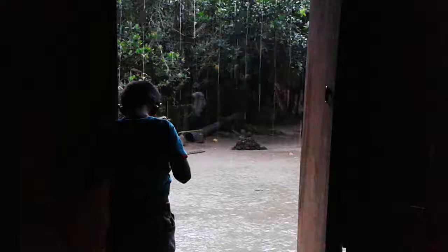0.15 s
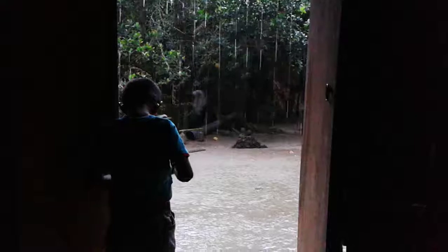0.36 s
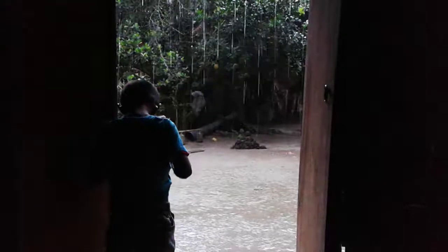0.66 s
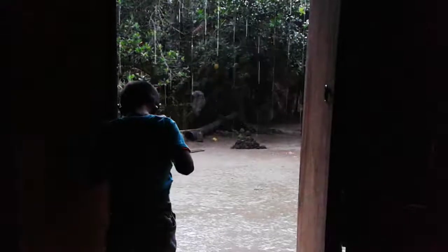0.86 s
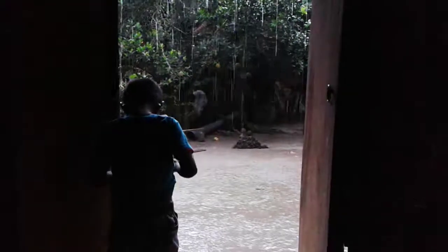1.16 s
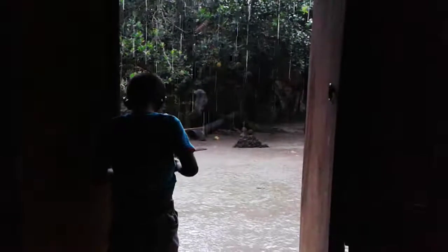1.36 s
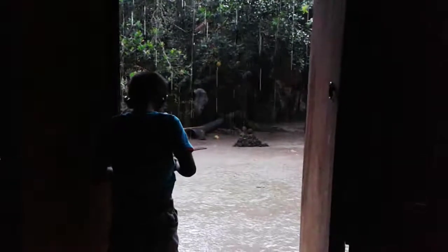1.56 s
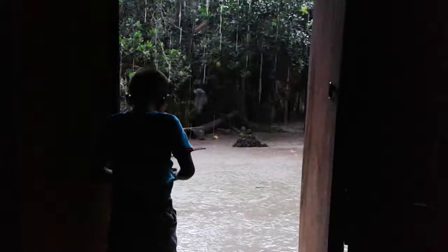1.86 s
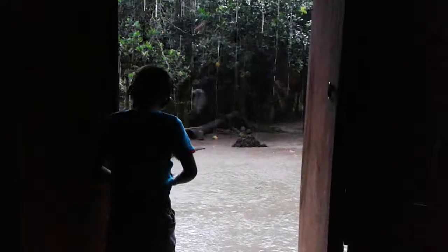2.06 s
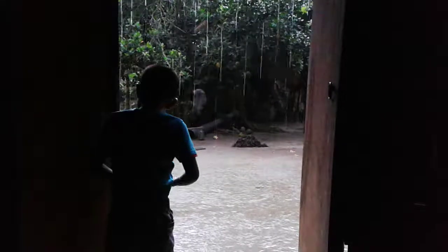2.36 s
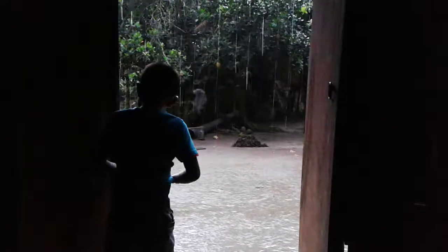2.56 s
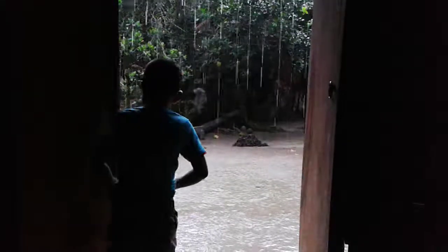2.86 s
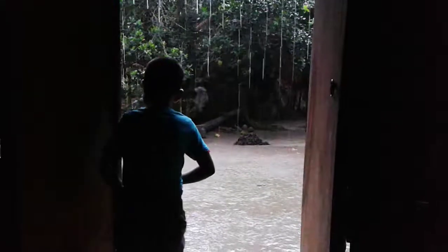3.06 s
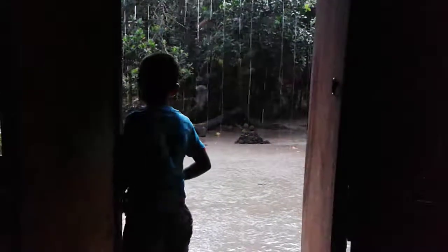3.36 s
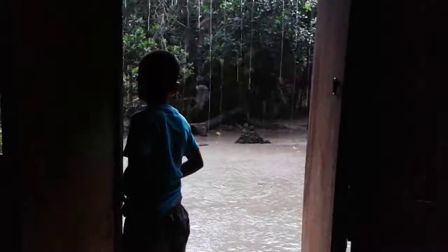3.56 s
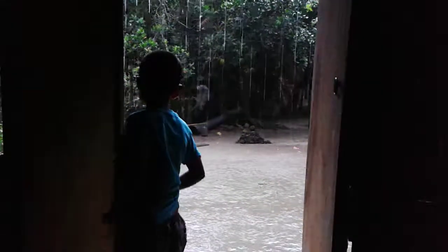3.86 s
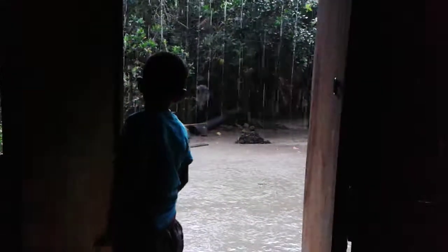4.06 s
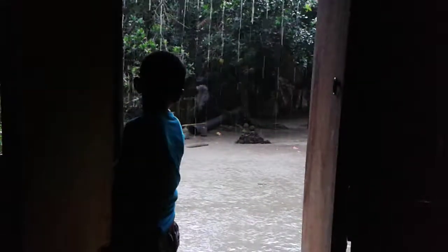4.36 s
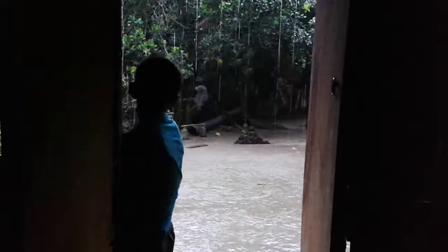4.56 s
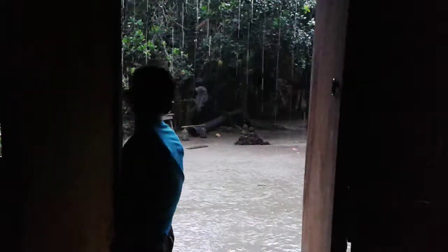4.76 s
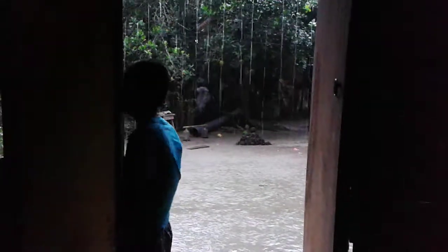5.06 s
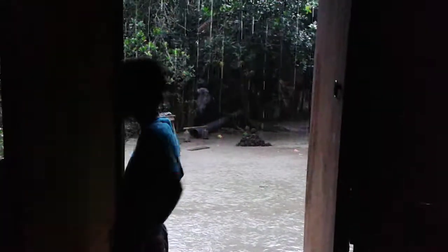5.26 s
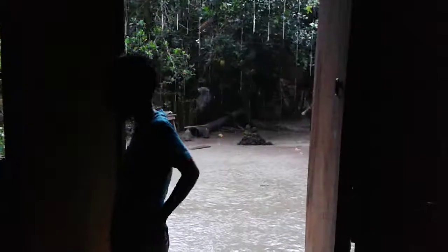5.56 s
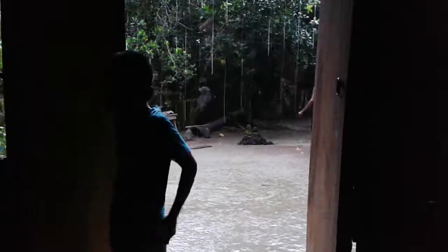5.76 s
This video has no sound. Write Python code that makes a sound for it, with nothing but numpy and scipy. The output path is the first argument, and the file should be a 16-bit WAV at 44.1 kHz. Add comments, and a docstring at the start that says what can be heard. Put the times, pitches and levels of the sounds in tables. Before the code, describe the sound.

Rain falls continuously on wet ground outside a wooden hut, the microphone just inside the doorway. Silence comes first, then a sudden full start. The bright, midrange-heavy hiss barely swells and eases; behind it lies a duller patter on forest leaves and roof. Scattered short drips splash nearby, some low and plopping, others crisp, most crowded near the beginning and end. The image is mono.

```python
"""A muddy yard ringed by forest, in steady rain, heard from just inside the doorway of a wooden hut.
A dull wash lies behind: flickering noise and soft ticks from rain on the trees and the roof.
On the yard, far drops merge into hiss, near ones tick, puddles ring like bubbles and splashes spray.
Large drips off the roof edge are short bursts of noise, each around its own pitch.
After a short silence the sound cuts in abruptly; it is mono."""
import sys
import numpy as np
from scipy import signal
from scipy.fft import rfft, irfft
from scipy.io import wavfile

SR = 44100
rng = np.random.default_rng(int(sys.argv[2]) if len(sys.argv) > 2 else 0)


def transcribe(u):
    """Save the signal u as a 16-bit wav file named by the first command-line argument.

    u: samples, shape (n,) or (channels, n), limited to [-1, 1]; the rate is SR.
    q: integer samples, one column per channel.
    """
    v = np.clip(np.atleast_2d(u).T, -1, 1)
    q = np.round(v * 32767).astype(np.int16)
    wavfile.write(sys.argv[1], SR, q)


N = 260234
TIME = np.arange(N) / SR   # seconds


def from_db(db):
    """Decibels to gain."""
    return 10 ** (np.asarray(db) / 20)


def rms_one(x):
    """Scale to unit power."""
    return x / np.sqrt(np.mean(x ** 2) + 1e-20)


def drift(rate_hz):
    """Slow chance with spread 1: noise through two equal low-passes, made at 1/40 of the sample rate."""
    step = 40
    settle = 2000   # slow samples dropped while the filter settles
    pole = np.exp(-2 * np.pi * rate_hz * step / SR)
    noise = rng.standard_normal(N // step + settle + 2)
    slow = signal.lfilter([1], [1, -2 * pole, pole ** 2], noise)[settle:]
    return np.interp(np.arange(N) / step, np.arange(len(slow)), rms_one(slow))


def band(x, hz, octaves):
    """Band-pass around a pitch; white noise keeps its power."""
    low = hz / 2 ** (octaves / 2)
    high = min(hz * 2 ** (octaves / 2), SR / 2 - 100)
    sos = signal.butter(2, [low, high], "band", fs=SR, output="sos")
    return signal.sosfilt(sos, x + 1e-18) * np.sqrt(SR / 2 / (high - low))


def resonance(x, hz, width_hz):
    """One two-pole resonance with gain 1 on top; the narrower it is, the longer it rings."""
    r = np.exp(-np.pi * width_hz / SR)
    zeros = np.array([1, 0, -1]) * (1 - r * r) / 2
    poles = [1, -2 * r * np.cos(2 * np.pi * hz / SR), r * r]
    return signal.lfilter(zeros, poles, x + 1e-18)


def coloured(x, spectrum, size=4096):
    """Minimum-phase filter that follows a spectrum, so that clicks keep sharp fronts; unit power."""
    hz, db = np.transpose(spectrum)
    grid_hz = np.linspace(1, SR / 2, size // 2 + 1)
    curve_db = np.interp(np.log(grid_hz), np.log(hz), db)
    # folding the cepstrum onto positive time makes the filter causal
    cepstrum = irfft(np.log(from_db(curve_db)))[:size // 2]
    cepstrum[1:] *= 2
    impulse = irfft(np.exp(rfft(cepstrum, size)))
    return rms_one(signal.fftconvolve(x, impulse)[:N])


def impacts(per_s, spread_db):
    """Drops land as single clicks at random moments; most are small or far, a few are large and near."""
    at = np.flatnonzero(rng.random(N) < per_s / SR)
    bigness = np.minimum(rng.exponential(1, len(at)), 4)
    out = np.zeros(N)
    out[at] = from_db(spread_db * bigness) * rng.choice([-1, 1], len(at))
    return out


def hiss(flicker_db, flicker_hz):
    """Far drops merge into noise whose octaves each swell and sink a little."""
    out = np.zeros(N)
    for hz in 30 * 2. ** np.arange(10):
        octave = band(rng.standard_normal(N), hz, 0.95)
        # power grows with pitch, as the octaves of white noise do
        out += np.sqrt(hz) * octave * from_db(flicker_db * drift(flicker_hz))
    return rms_one(out)


def patter(per_s, spread_db):
    """Separate drops tick as bare clicks."""
    return rms_one(impacts(per_s, spread_db))


def plinks(per_s, spread_db, cycles, count=28):
    """Drops in puddles trap bubbles that ring for some cycles, each size at its own pitch."""
    out = np.zeros(N)
    for hz in np.geomspace(700, 7000, count):
        bubbles = resonance(impacts(per_s / count, spread_db), hz, hz / cycles)
        out += np.sqrt(hz) * rms_one(bubbles)
    return rms_one(out)


def splashes(per_s, spread_db, spray_s, grain, small_db, count=7):
    """Water bursts into short sprays of droplets; big splashes fill all pitches, small ones one band."""
    big = rms_one(impacts(per_s, spread_db)) ** 2
    fade = np.exp(-1 / (spray_s * SR))
    out = np.zeros(N)
    for hz in np.geomspace(800, 13000, count):
        small = (from_db(small_db) * rms_one(impacts(per_s, spread_db))) ** 2
        # each spray starts at once and dies away
        energy = signal.lfilter([1 - fade], [1, -fade], big + small)
        droplets = rng.standard_normal(N) * np.exp(grain * rng.standard_normal(N))
        out += np.sqrt(hz) * band(np.sqrt(energy) * droplets, hz, 0.68)
    return rms_one(out)


# Strength of the shower, which drives the wash and the yard but not the drips.
# Each row: time in seconds, level in dB before each layer's own trim.
SHOWER = [(0.45, -32.5), (0.7, -31.5), (1.35, -31.1), (2.0, -31.5), (2.25, -31), (2.8, -32.0), (3.7, -32.5),
          (4.7, -32.5), (5.2, -32), (5.9, -31)]


def shower_strength():
    """The shower strengthens and eases along straight lines in dB."""
    return np.interp(TIME, *np.transpose(SHOWER))


# Colour of the dull wash before the hut.
# Each row: frequency in Hz, relative level per Hz in dB.
WASH = [(20, -38), (33, -29), (50, -11), (120, -7.5), (200, -1), (250, -4), (350, 0.5), (490, -1.5),
        (640, 3), (850, 0.5), (1200, 0), (2000, -17), (5000, -24.5)]


def dull_wash(shower_db):
    """Rain on the trees and the roof follows the same shower with a wider swing."""
    below_db = -11.0   # under the mean shower level
    follows = 1.4   # dB of swell per dB of shower
    far = hiss(flicker_db=1.5, flicker_hz=4.7) + from_db(-5.0) * patter(per_s=400, spread_db=2.5)
    mean_db = shower_db.mean()
    level_db = mean_db + below_db + follows * (shower_db - mean_db)
    return from_db(level_db) * coloured(far, WASH)


# Colour of the rain on the yard before the hut.
# Each row: frequency in Hz, relative level per Hz in dB.
YARD = [(100, -24), (500, -11), (1000, -7.5), (1600, -4.5), (2200, -4), (2900, -1.5), (3750, -3.5),
        (4650, 1.5), (5300, -2.5), (7000, -13.5), (8700, -22.5), (11000, -27), (15000, -32.5)]


def yard_rain(shower_db):
    """Hiss, ticks, doorstep drops, plinks and splashes on open ground rise and fall with the shower."""
    far_drops = from_db(-2.5) * hiss(flicker_db=1.0, flicker_hz=15.0)
    wet_ground = from_db(-10.5) * patter(per_s=2600, spread_db=1.5)
    doorstep = from_db(-17.0) * patter(per_s=55, spread_db=1.9)
    puddles = from_db(-13.0) * plinks(per_s=600, spread_db=2.5, cycles=26.0)
    sprays = from_db(-5.5) * splashes(per_s=100, spread_db=1.5, spray_s=0.014, grain=0.39, small_db=-1.5)
    yard = far_drops + wet_ground + doorstep + puddles + sprays
    return from_db(shower_db - 0.43) * coloured(yard, YARD)


# The loudest drips off the roof edge.
# Each row: start in seconds, level in dB before the common trim, centre pitch in Hz.
DRIPS = [(.660, -29.5, 4770), (.747, -31.5, 1760), (.868, -35.5, 685), (.996, -32, 1760),
         (1.183, -28, 2950), (1.290, -36, 1050), (1.3185, -40, 7700), (1.866, -36, 4900),
         (2.210, -28, 4340), (2.640, -35.5, 895), (2.6499, -40.5, 9000), (2.664, -35, 736),
         (3.192, -47, 12000), (3.926, -29, 4570), (4.212, -45, 8460), (5.132, -36.5, 1450),
         (5.1962, -47, 9500), (5.214, -28, 4640), (5.312, -33, 1780), (5.4226, -41, 11500),
         (5.555, -35, 850), (5.694, -36, 890)]


def drips(octaves, grain, level_db, skirt_db, skirt_octaves):
    """Each large drip splashes around its own pitch and dies away in fine spray; the higher, the sooner."""
    hold_s, t60_s = 0.017, 0.17   # full splash, then 60 dB of fade, for a drip at 1 kHz
    shortens = 0.35   # both shorten with this power of the pitch
    out = np.zeros(N)
    age = TIME[:SR // 5]
    for start_s, db, hz in DRIPS:
        pace = (hz / 1000) ** shortens
        fade_db = 60 * np.maximum(age * pace - hold_s, 0) / t60_s
        droplets = rng.standard_normal(len(age)) * np.exp(grain * rng.standard_normal(len(age)))
        core = band(droplets, hz, octaves)
        skirt = from_db(skirt_db) * band(droplets, hz, skirt_octaves)   # softer and wider
        splash = from_db(db + level_db - fade_db) * rms_one(core + skirt)
        at = round(start_s * SR)
        out[at:at + len(age)] += splash[:N - at]
    return out


# Hollow resonances of the hut.
# Each row: frequency in Hz, width in Hz, lift in dB that it gives on its own.
HUT = [(104, 19, 3), (204, 20, 0.5), (612, 15, 3), (690, 24, 2), (1006, 99, 3), (1060, 40, 0),
       (1214, 27, 2.5), (1400, 99, 2), (1494, 35, 5), (1628, 43, 2.5), (1810, 49, 2), (4100, 130, 1.5)]


def hut(x):
    """The wooden room lifts a few pitches by adding its resonances to the direct sound."""
    return x + sum((from_db(db) - 1) * resonance(x, hz, width_hz) for hz, width_hz, db in HUT)


def scene():
    """The dull wash, the rain on the yard and the large drips, all coloured by the hut; both sides alike."""
    shower_db = shower_strength()
    rain = dull_wash(shower_db) + yard_rain(shower_db)
    roof_edge = drips(octaves=0.39, grain=0.2, level_db=-5.0, skirt_db=-10.5, skirt_octaves=1.1)
    mono = hut(rain + roof_edge)
    return np.array([mono, mono])


def record(dry):
    """The sound cuts in from silence; a steep low-pass removes the top."""
    start_s, cutoff_hz = 0.4115, 15100
    low_pass = signal.ellip(12, 0.1, 80, cutoff_hz, fs=SR, output="sos")
    return signal.sosfilt(low_pass, dry * (TIME >= start_s) + 1e-18)


dry = scene()
out = record(dry)
transcribe(out)
```